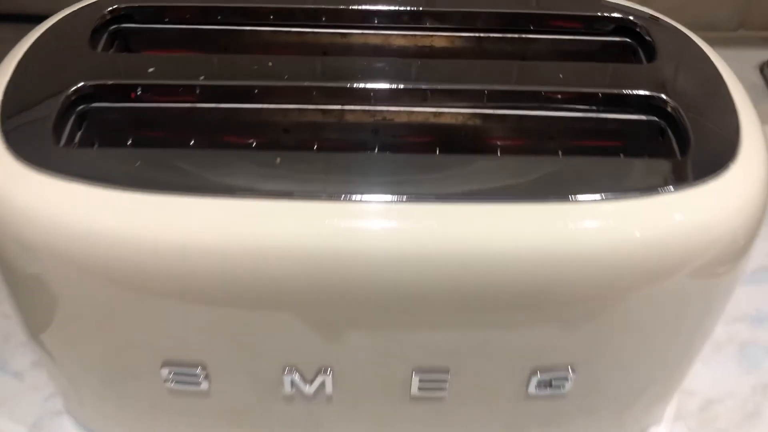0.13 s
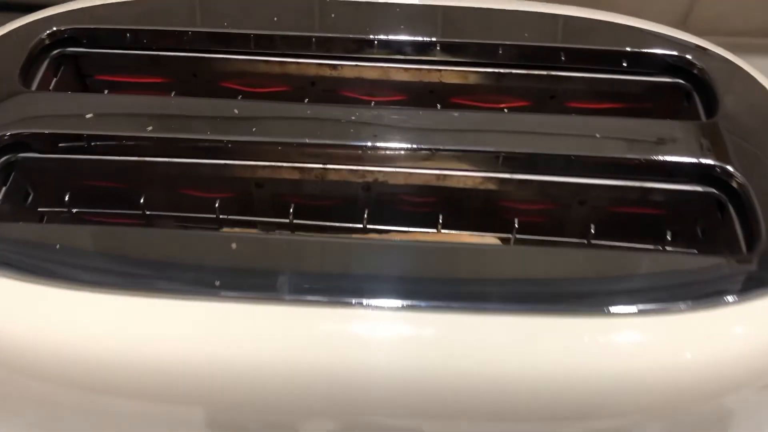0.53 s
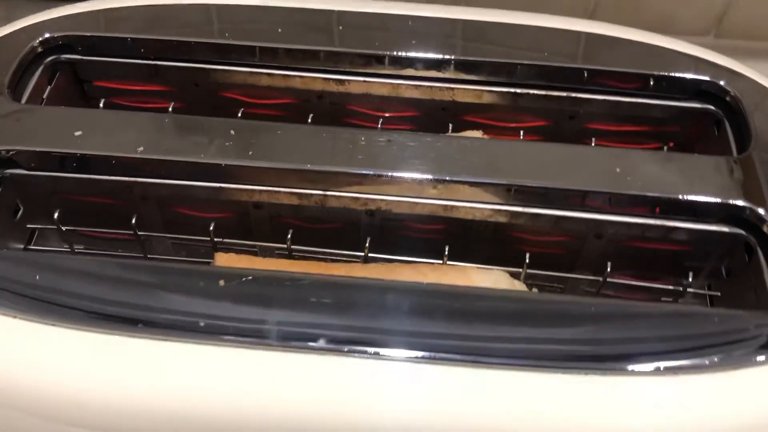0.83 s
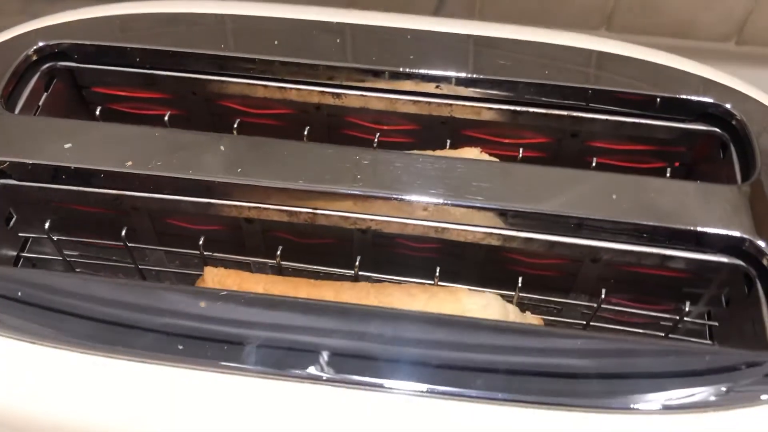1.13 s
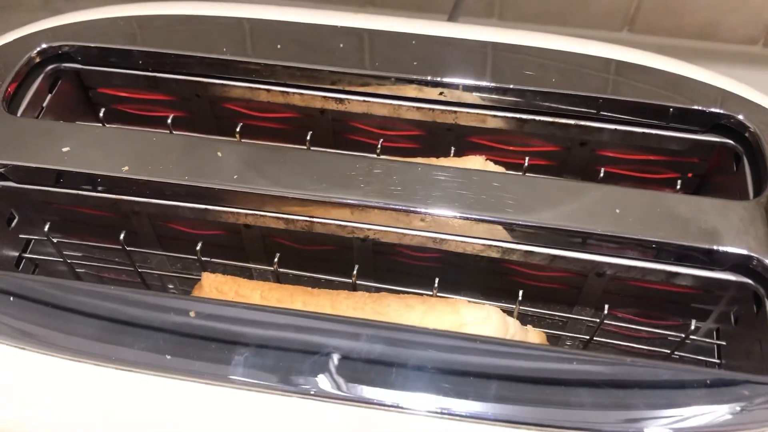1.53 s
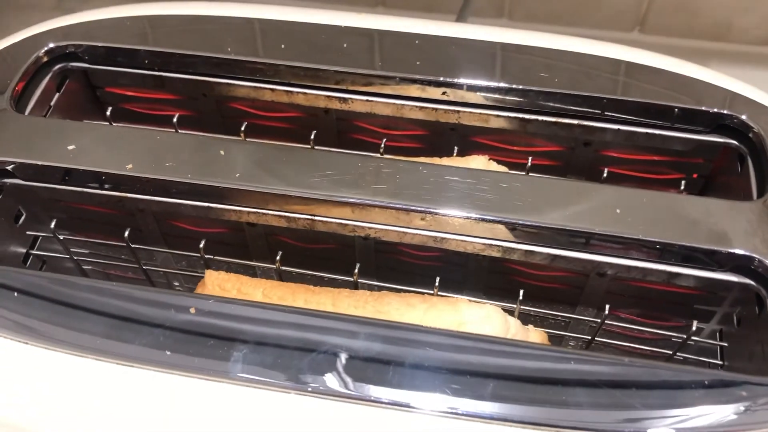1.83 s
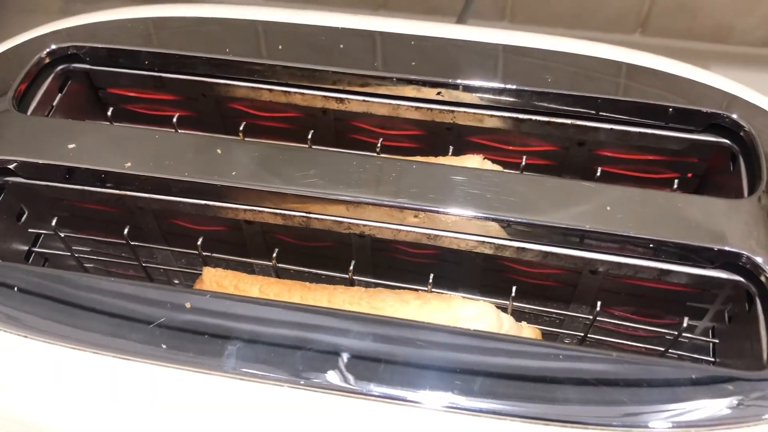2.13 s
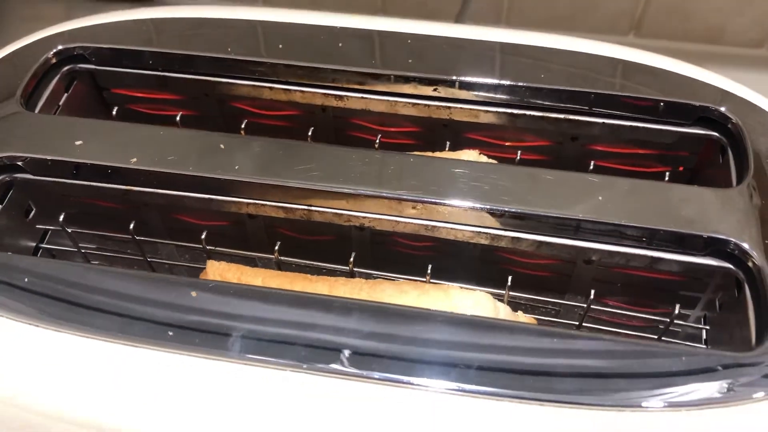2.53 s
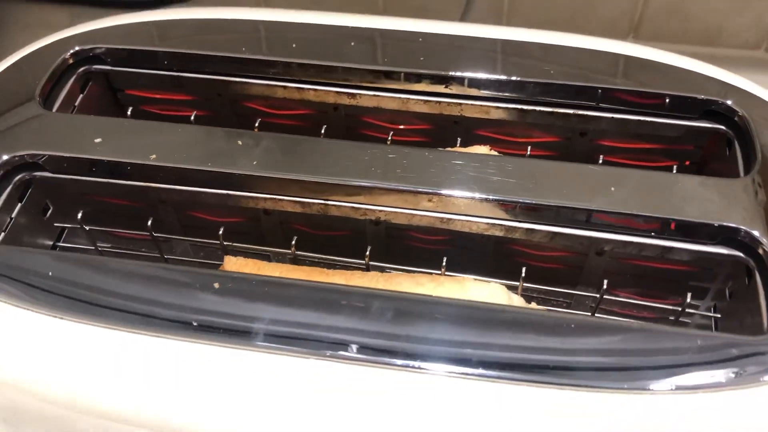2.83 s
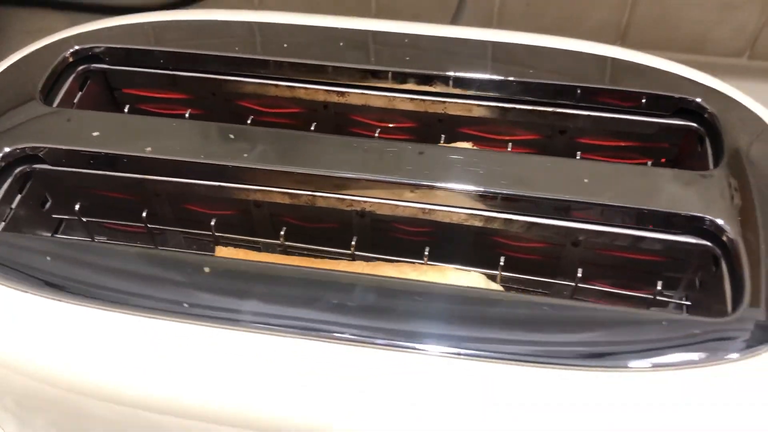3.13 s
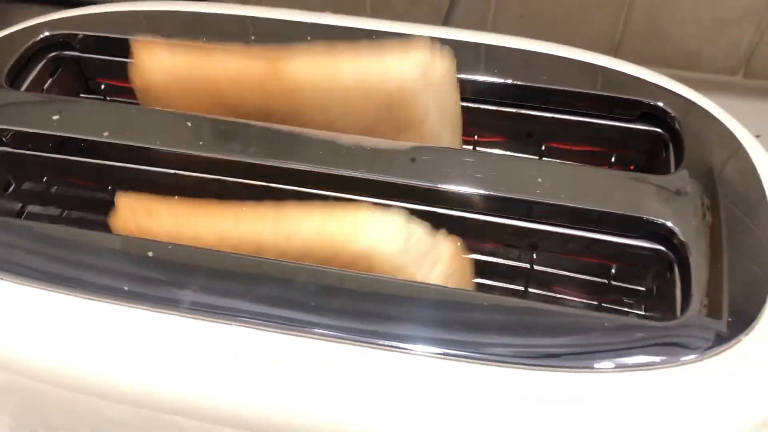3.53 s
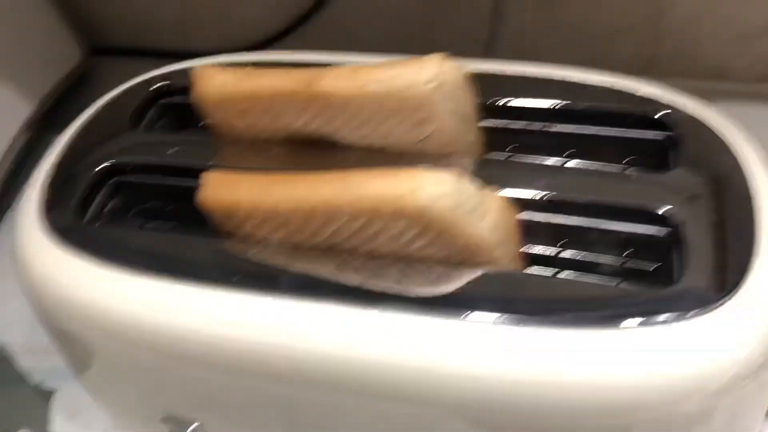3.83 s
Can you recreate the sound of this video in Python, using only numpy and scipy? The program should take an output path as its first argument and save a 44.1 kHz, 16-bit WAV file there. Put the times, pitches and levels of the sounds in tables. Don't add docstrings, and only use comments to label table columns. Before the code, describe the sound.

Toaster carriage springs up, slamming and rattling sharply in a quiet kitchen with faint fridge hum

```python
import sys
import numpy as np
from scipy import signal
from scipy.fft import rfft, irfft
from scipy.io import wavfile
from scipy.ndimage import uniform_filter1d

SR = 44100
rng = np.random.default_rng(int(sys.argv[2]) if len(sys.argv) > 2 else 0)


def invert_db(level):
    return 10 ** (np.asarray(level, dtype=float) / 20)


def digitize_waveform(pressure):
    field = np.atleast_2d(pressure).T
    bounded = np.clip(field, -1, 1)
    quanta = np.round(bounded * 32767).astype(np.int16)
    wavfile.write(sys.argv[1], SR, quanta)


N = 176400
TAIL_N = 22050

# f/Hz, level/dB
FRIDGE_PARTIALS = [(49.2, -69), (75, -74), (99.9, -65), (112.2, -77), (124.7, -76), (212, -67), (299.5, -90.5),
                   (2755, -91), (2804.6, -93.5), (3247.8, -89.5), (3297, -85.5), (3690.9, -86.5), (4970, -90),
                   (5167, -102)]
# f/Hz, width/Hz, level/dB
CABINET = [(108.4, 58, -69), (208, 47, -74), (302.5, 54, -70.5), (536.6, 25.3, -63.5), (601, 47, -65.5),
           (727, 58, -74), (1140, 650, -75), (3260, 32, -82.5), (5190, 500, -87)]
# f/Hz, level/dB
AIR_SPECTRUM = [(60, -31), (160, -14.5), (460, -9), (900, -14.5), (1800, -24), (3500, -25), (11000, -31.5),
                (16000, -41)]
# t/s, level/dB, f/Hz, t60/s
FAR_KNOCKS = [(.2724, -58, 2980, 0.28), (.275, -62, 1290, 0.38), (.31, -67, 3050, 0.54),
              (.4016, -64.5, 3300, 0.3), (.4411, -60, 3800, 0.23), (.48, -66, 3320, 0.74),
              (.62, -71.5, 2520, 0.84), (.72, -69, 5300, 0.7), (1.651, -69, 600, 0.047),
              (2.04, -66, 11000, .03), (3.06, -72, 3500, .6), (3.12, -73, 3480, 0.67),
              (3.18, -75, 5000, 0.67), (3.4308, -61.5, 3000, 0.3)]
BLOW_TIMES_S = [3.4603, 3.4722, 3.4765, 3.484, 3.4895, 3.4955, 3.504, 3.52, 3.532, 3.545, 3.5905, 3.598,
                3.619, 3.647, 3.755]
# level/dB, length/s, treble/dB, thud/dB
CARRIAGE_BLOWS = [(-30.5, 0.053, -3, -12), (-23, 0.021, -5, -11), (-23.5, 0.013, -7, -7),
                  (-17.5, 0.011, 5, 0), (-18, 0.0029, -2, -6), (-20, 0.0052, -3, 0.5),
                  (-26.5, 0.0038, -5, -4), (-38, .006, 3, -6), (-28, .006, 7, 1), (-27, .01, -1, -4),
                  (-26, 0.0053, 3.5, -11), (-27.5, 0.0097, -5, -20), (-35, 0.0038, -19, -12),
                  (-29, 0.0065, -3, 1), (-42, 0.0084, -5, -6)]
# t/s, level/dB, treble/dB
WIRE_RATTLE = [
    (3.479, -51, 12),
    (3.49, -37, 6.5),
    (3.58, -33.5, 7.5),
    (3.629, -29.5, -0.5),
    (3.68, -39.5, 2.5),
    (3.77, -42.5, -4.5),
    (3.799, -46.5, -3.5),
    (3.9, -51, 0),
    (4, -53, 4),
]
# t/s, level/dB, f/Hz, t60/s
STRUCK_PARTS = [(3.473, -22, 2070, .08), (3.486, -18, 11500, 0.027), (3.489, -18.5, 3070, 0.046),
                (3.492, -25, 1960, 0.076), (3.53, -22, 12600, 0.045), (3.545, -27, 9000, .06),
                (3.5915, -26, 9300, .06), (3.593, -31, 2040, 0.19), (3.594, -31.5, 3800, 0.11),
                (3.64, -35.5, 3300, 0.082), (3.714, -39, 6840, 0.1), (3.75, -44, 11500, .12),
                (3.755, -49.5, 2130, 0.13), (3.76, -41, 8240, .1), (3.811, -46.5, 8600, 0.09),
                (3.815, -51, 12500, .1), (3.838, -52, 10400, .12), (3.852, -49.5, 6550, .12),
                (3.8838, -45.5, 8500, 0.11), (3.8845, -49, 10300, 0.083), (3.9262, -50.5, 8140, 0.1),
                (3.928, -55, 12900, .12), (3.968, -55, 10400, 0.16)]
# f/Hz, level/dB
STEEL_SPECTRUM = [(150, 2), (300, -5), (1000, -2), (1550, -5), (1900, -5.5), (4400, -2.5), (10000, -1.5),
                  (16000, -11.5)]
# f/Hz, level/dB, t60/s
PANEL_MODES = [(1035, -8, 0.071), (1887, 3.5, .06), (2323, 5.5, 0.068), (2820, 5, 0.048),
               (3394, 8.5, 0.043), (3800, 13.5, .03), (5270, 3, 0.029), (6270, -19, 0.057), (8500, 0, .02),
               (9300, -14, 0.02), (11500, -12, 0.014)]
# f/Hz, level/dB, t60/s
SHELL_MODES = [(124.3, 0.5, 0.081), (230, -1.5, 0.058), (254, -0.5, 0.046), (280, 1, 0.06),
               (403, -7, 0.055), (740, 7, 0.013)]
# f/Hz, level/dB, t60/s
RACK_MODES = [(1970, -8, .3), (2240, -19, .4), (3940, 5, 0.46), (4970, -11, 0.32), (5600, -12, .4),
              (6400, 7, 0.81), (7250, 8, .35), (8123, 0, .4), (9300, -2, 0.45), (10360, -6, .5),
              (11300, -5, 0.45), (12090, -7, 0.59), (13400, -1, .4)]

AIR_DB, WOBBLE_DB = -65.5, 0.6
CLICKS_PER_S, CLICK_SPREAD_DB = 6000, 1.5
ATTACK_S, SHEET_T60_S, WIRE_T60_S = 0.0006, 0.012, 0.028
STEEL_DB, PANELS_DB, SHELL_DB, RACKS_DB, WIRES_DB = 2, -13.5, -9.5, -22, -12
ROOM_DB, ROOM_T60_S, ROOM_TOP_HZ = -10.5, 0.54, 5000
PHONE_LOW_HZ, PHONE_TOP_HZ, PHONE_LIMIT = 40, 15950, 0.69


def unit(x):
    return x / np.sqrt(np.mean(x ** 2))


def colour(x, points):
    hz, db = np.array(points, float).T
    f = np.arange(len(x) // 2 + 1) * SR / len(x) + 1
    gain = invert_db(np.interp(np.log(f), np.log(hz), db))
    return irfft(rfft(x) * gain, len(x))


def resonate(x, hz, width_hz):
    b, a = signal.iirpeak(min(hz, 18000), hz / width_hz, fs=SR)
    return signal.lfilter(b, a, signal.lfilter(b, a, x))


def fade(t60_s, size=TAIL_N):
    return np.exp(-np.log(1000) * np.arange(size) / SR / t60_s)


def through(x, h):
    return signal.fftconvolve(x, h)[:len(x)]


def walk(rate_hz):
    k = int(SR / rate_hz)
    smooth = uniform_filter1d(rng.standard_normal(N), k)
    return unit(uniform_filter1d(smooth, k))


def add(out, t_s, x):
    i = int(t_s * SR)
    out[i:i + len(x)] += x[:len(out) - i]


def fridge():
    t = np.arange(N) / SR
    wobble = walk(9)
    out = np.zeros(N)
    for k, (hz, db) in enumerate(FRIDGE_PARTIALS):
        drift_db = WOBBLE_DB * np.roll(wobble, 9000 * k) if k > 0 else 0
        out += invert_db(db + drift_db) * np.sqrt(2) * np.sin(2 * np.pi * hz * t + k)
    for hz, width_hz, db in CABINET:
        out += invert_db(db) * unit(resonate(rng.standard_normal(N), hz, width_hz))
    air = unit(colour(rng.standard_normal(N), AIR_SPECTRUM))
    return out + invert_db(AIR_DB + 0.5 * walk(0.48)) * air


def struck(rows, q, sparse):
    out = np.zeros(N)
    for t_s, db, hz, t60_s in rows:
        x = rng.standard_normal(TAIL_N)
        tone = unit(resonate(x * np.abs(x) ** sparse, hz, hz / q))
        add(out, t_s, invert_db(db) * tone * fade(t60_s))
    return out


def contacts():
    hit = rng.random(N) < CLICKS_PER_S / SR
    size = invert_db(CLICK_SPREAD_DB * rng.exponential(size=N))
    return unit(hit * rng.standard_normal(N) * size)


def sheet_noise():
    power = through(contacts() ** 2, fade(SHEET_T60_S, size=2000) ** 2)
    return unit(np.sqrt(np.abs(power)) * rng.standard_normal(N))


def ring(modes):
    t = np.arange(TAIL_N) / SR
    h = sum(invert_db(db) * fade(t60_s) * np.sin(2 * np.pi * hz * t) for hz, db, t60_s in modes)
    return h / np.linalg.norm(h)


def carriage():
    t = np.arange(N) / SR
    rattle_s, rattle_db, rattle_treble_db = np.array(WIRE_RATTLE).T
    body = invert_db(np.interp(t, rattle_s, rattle_db, left=-200) + 1.14 * walk(31))
    treble = body * invert_db(np.interp(t, rattle_s, rattle_treble_db))
    thud = invert_db(2) * body
    attack = np.minimum(np.arange(1, 6001) / SR / ATTACK_S, 1)
    for t_s, (db, length_s, treble_db, thud_db) in zip(BLOW_TIMES_S, CARRIAGE_BLOWS):
        blow = invert_db(db) * fade(6.4 * length_s, size=6000) * attack
        add(body, t_s, blow)
        add(treble, t_s, invert_db(treble_db) * blow)
        add(thud, t_s, invert_db(thud_db) * blow)
    return body, treble, thud


def shell(thud):
    highpass = signal.butter(4, 100, "high", fs=SR, output="sos")
    boom = through(rng.standard_normal(N) * thud, ring(SHELL_MODES))
    return invert_db(SHELL_DB) * signal.sosfilt(highpass, boom)


def wires(drive, count=500):
    out, t = np.zeros(N), np.arange(TAIL_N) / SR
    start_s, end_s = WIRE_RATTLE[0][0], WIRE_RATTLE[-1][0] - 0.001
    for when, pitch, size in rng.random((count, 3)):
        t_s = start_s + when * (end_s - start_s)
        hz = 1800 * 8.3 ** pitch
        force = drive[int(t_s * SR)] * invert_db(11.3 * size)
        add(out, t_s, force * fade(WIRE_T60_S) * np.sin(2 * np.pi * hz * t))
    return invert_db(WIRES_DB) * out


def toaster():
    body, treble, thud = carriage()
    grain = sheet_noise()
    lowpass = signal.butter(2, 5000, fs=SR, output="sos")
    knock = signal.sosfilt(lowpass, grain * (body - treble)) + grain * treble
    steel = invert_db(STEEL_DB) * colour(knock, STEEL_SPECTRUM)
    panels = invert_db(PANELS_DB) * through(knock, ring(PANEL_MODES))
    racks = invert_db(RACKS_DB) * through(knock, ring(RACK_MODES))
    return steel + panels + racks + wires(body) + shell(thud)


def kitchen(x):
    h = rng.standard_normal(TAIL_N) * fade(ROOM_T60_S)
    h[:201] = 0
    h = signal.lfilter(*signal.butter(1, ROOM_TOP_HZ, fs=SR), h)
    return invert_db(ROOM_DB) * through(x, h / np.linalg.norm(h))


def scene():
    background = fridge() + struck(FAR_KNOCKS, q=1.0, sparse=0.26)
    near = toaster() + struck(STRUCK_PARTS, q=5.4, sparse=0.5)
    return (near + kitchen(near) + background)[None]


def low_pass(x):
    return signal.sosfilt(signal.butter(12, 16410, fs=SR, output="sos"), x)


def record(dry):
    highpass = signal.butter(3, PHONE_LOW_HZ, "high", fs=SR, output="sos")
    lowpass = signal.ellip(10, 0.3, 70, PHONE_TOP_HZ, fs=SR, output="sos")
    heard = signal.sosfilt(highpass, dry)
    rounded = PHONE_LIMIT * np.tanh(heard / PHONE_LIMIT)
    mix = signal.sosfilt(lowpass, rounded)
    return low_pass(mix)


dry = scene()
out = record(dry)
digitize_waveform(out)
```